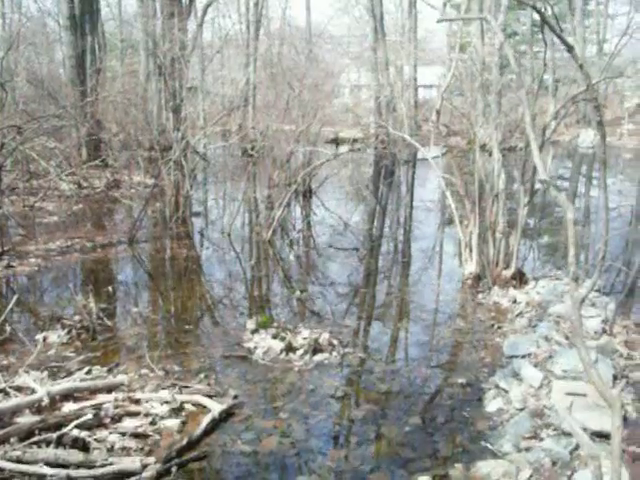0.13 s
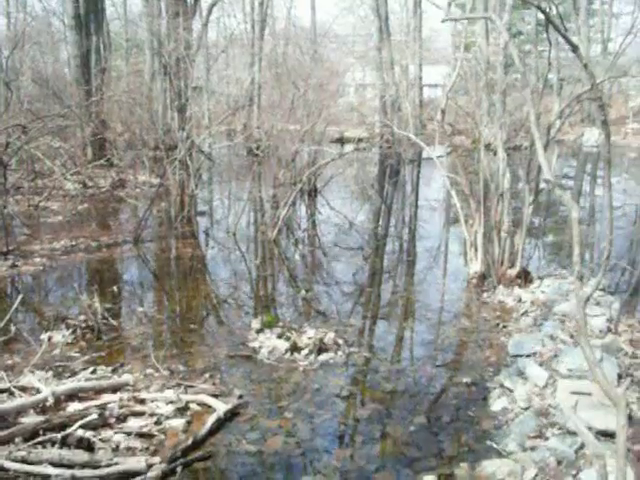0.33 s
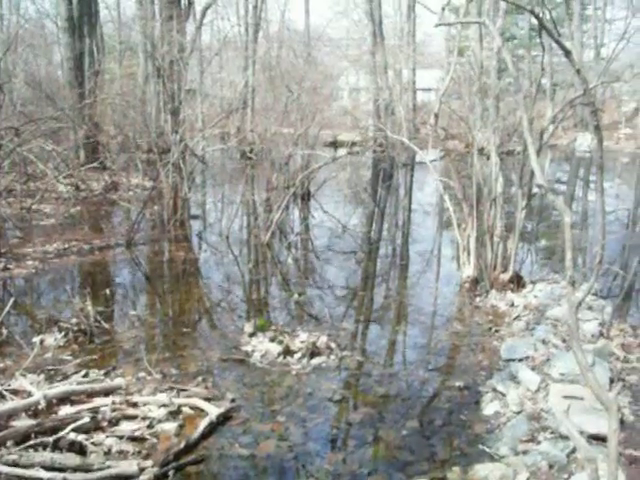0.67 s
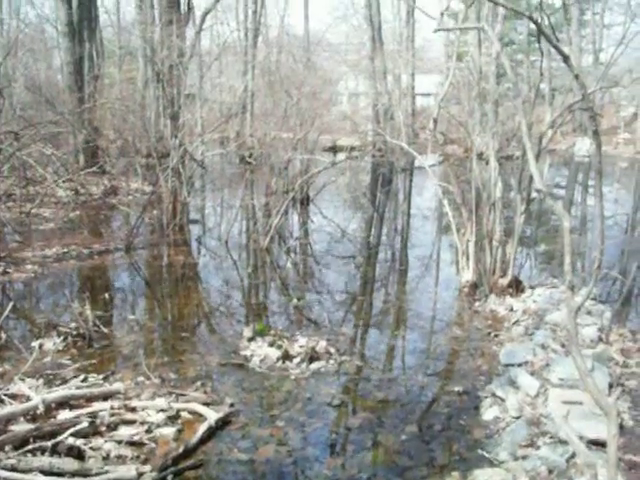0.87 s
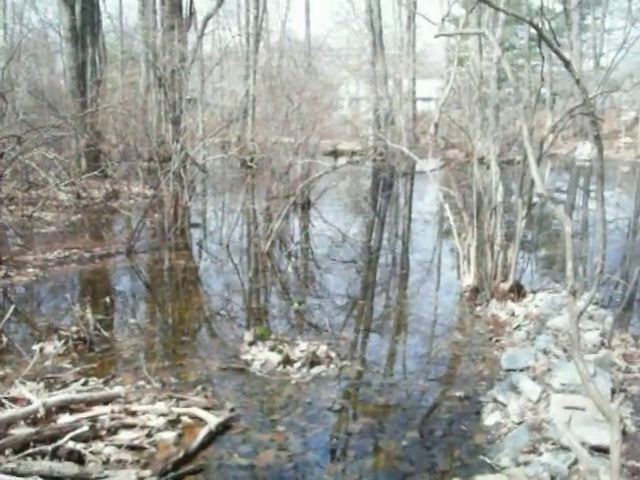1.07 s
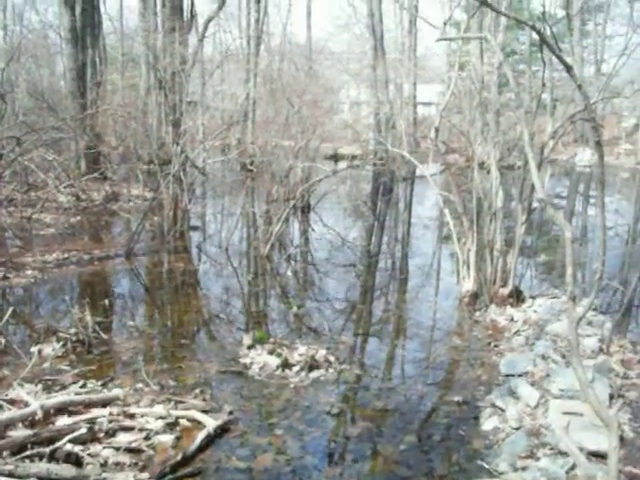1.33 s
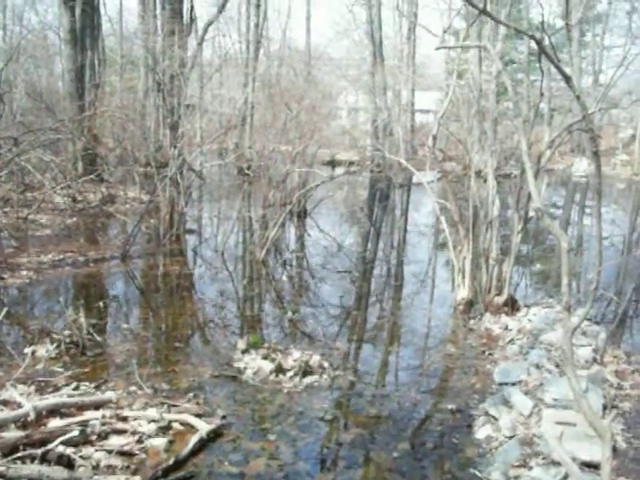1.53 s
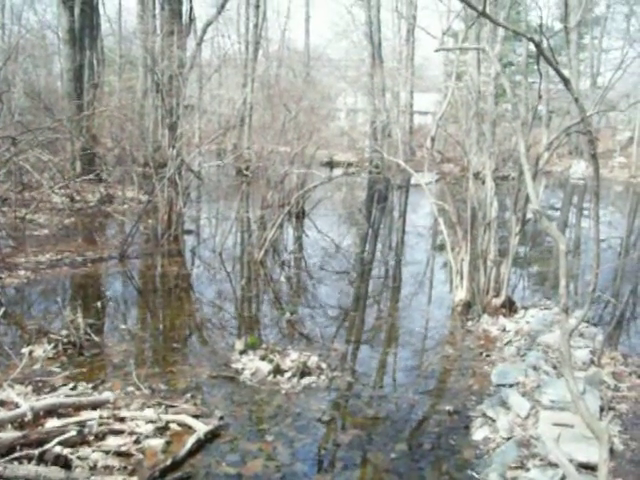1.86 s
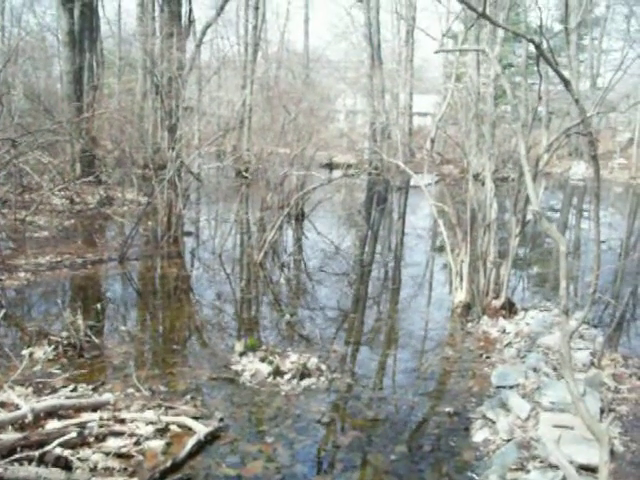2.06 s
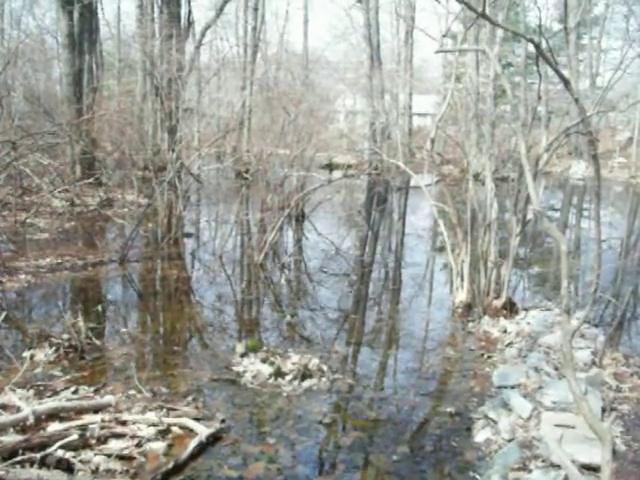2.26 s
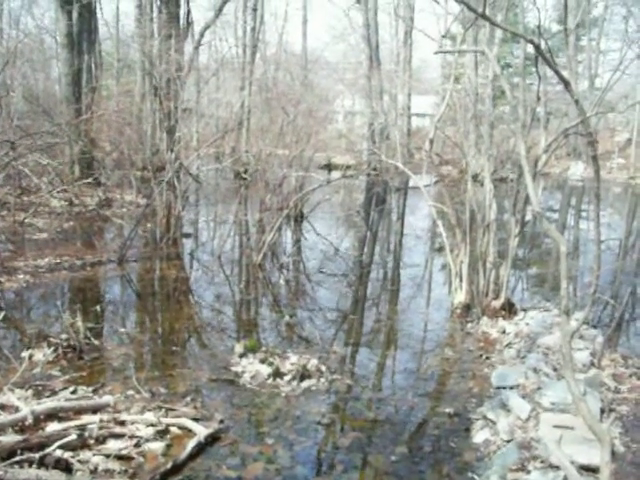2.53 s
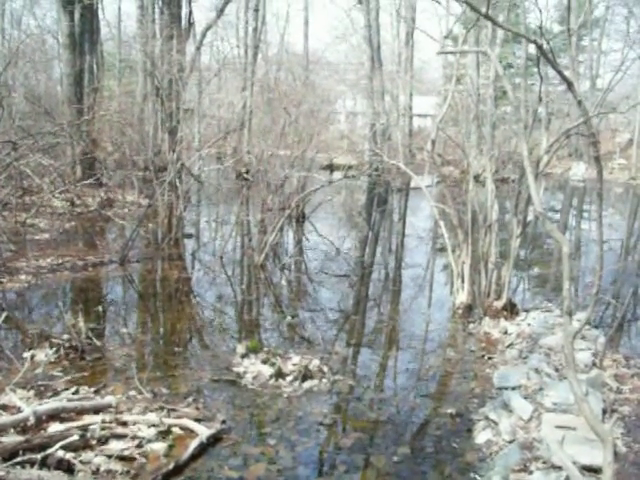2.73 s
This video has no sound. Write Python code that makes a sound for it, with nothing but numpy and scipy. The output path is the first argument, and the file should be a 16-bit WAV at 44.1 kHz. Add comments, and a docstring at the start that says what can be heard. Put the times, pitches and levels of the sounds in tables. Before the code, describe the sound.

A dense chorus of frogs, short raspy quacks near and far, runs continuously over a flooded wood; faint high trills and a few dry ticks join, while low wind thumps a small, dull, hissy microphone.

```python
"""A chorus of frogs quacks across a flooded wood: short rasping notes from near and far,
with a few thin high trills, dry ticks close by and wind buffeting the small microphone.
Quacks are wavering tones plus pulsed resonances, trills are roughened gliding tones, ticks are
bursts of noise, and wind and the farthest frogs are shaped noise. The recorder switches on just
after the start, with an offset that settles and a gain that opens."""
import sys
import numpy as np
from scipy import signal
from scipy.fft import rfft, irfft
from scipy.io import wavfile

SR = 44100
rng = np.random.default_rng(int(sys.argv[2]) if len(sys.argv) > 2 else 0)


def generate_wav(sig):
    """Save sig (samples, or channels by samples) to the path in sys.argv[1] as 16-bit PCM at SR."""
    pcm = np.round(np.clip(np.atleast_2d(sig).T, -1, 1) * 32767).astype(np.int16)
    wavfile.write(sys.argv[1], SR, pcm)


N = 127449

# bustle of the far chorus: (time [s], level change [dB])
FAR_BUSTLE = [(0.1, -1), (0.65, -1.5), (1.1, -0.5), (1.76, -3), (1.95, 2.5), (2.1, 0), (2.21, -10),
              (2.3, 2), (2.7, -1)]

ATTACK_S, RELEASE_S = 0.0059, .007   # of every quack


def amp(db):
    """Amplitude factor of a level in dB."""
    return 10 ** (np.asarray(db) / 20)


def rms_one(x):
    """Scale a sound to rms 1."""
    return x / np.sqrt(np.mean(x ** 2) + 1e-20)


def resonate(x, hz, width_hz):
    """Two-pole resonance applied twice, gain about 1 at its peak."""
    r = np.exp(-np.pi * width_hz / SR)
    b = [(1 - r * r) / 2, 0, (r * r - 1) / 2]
    a = [1, -2 * r * np.cos(2 * np.pi * hz / SR), r * r]
    return signal.lfilter(b, a, signal.lfilter(b, a, x))


def drift(rate_hz):
    """Slow random wandering of rms 1: noise through two equal one-pole low-passes."""
    r = np.exp(-2 * np.pi * rate_hz / SR)
    noise = rng.standard_normal(N + SR)
    wander = signal.lfilter([1], [1, -2 * r, r * r], noise)
    return rms_one(wander[SR:])   # drop the filter's first second


def coloured(spectrum):
    """Noise of rms 1 with a given spectrum, silent below its first frequency."""
    hz, db = np.transpose(spectrum)
    f = np.arange(N // 2 + 1) * SR / N + 1e-3   # kept above 0 for the logarithm
    gain = amp(np.interp(np.log(f), np.log(hz), db)) * (f > hz[0])
    return rms_one(irfft(rfft(rng.standard_normal(N)) * gain, N))


def swell(length):
    """Times and envelope of a note: attack, hold, release."""
    t = np.arange(int((max(length, .005) + 5 * RELEASE_S) * SR)) / SR
    attack = np.sin(np.pi / 2 * np.clip(t / ATTACK_S, 0, 1)) ** 2
    release = np.exp(-np.maximum(t - length, 0) / RELEASE_S)
    return t, attack * release


def add(track, s, sound):
    """Mix a sound into the track from time s."""
    i = int(s * SR)
    track[i:i + len(sound)] += sound


def bustle_db():
    """Level change of the far chorus at every sample."""
    return np.interp(np.arange(N) / SR, *np.transpose(FAR_BUSTLE))


def quack(db, low_hz, mid_hz, high_hz, length, mid_db, high_db, rasp_db, chance):
    """Three wavering tones that rise and sag, throbbing with the throat pulses, which also rasp above them."""
    # resonances of the rasp: (frequency [Hz], width [Hz], level [dB])
    rasp_resonances = [(1260, 1130, -7), (2340, 450, 6), (2984, 790, 3.5), (4800, 1700, -9)]
    arch, rise, throb_depth = .03, .04, 0.34   # shares of pitch, pitch and amplitude
    wobble_step_s, wobble_db, wobble_rad = .004, 2.5, 1.0
    pulses_per_low_cycle, jitter, pulse_spread_db = .5, .1, 4

    t, envelope = swell(length)
    arched = arch * (.5 - (2 * t / length - 1).clip(-1, 2) ** 2)
    bend = 1 + arched + rise * (t / length - .5).clip(-1, 1)
    # rows of chance: 0-2 tone levels, 3-5 tone phases, 6 pulse timing, 7 pulse strength
    wobble = [np.interp(t / wobble_step_s, np.arange(len(row)), row) for row in chance]
    pulse_cycles = np.cumsum(bend * (1 + jitter * wobble[6])) / SR * low_hz * pulses_per_low_cycle

    tones = 0
    for k, (hz, level_db) in enumerate([(low_hz, 0), (mid_hz, mid_db), (high_hz, high_db)]):
        phase = 2 * np.pi * hz * np.cumsum(bend) / SR + wobble_rad * wobble[k + 3]
        tones = tones + amp(level_db + wobble_db * wobble[k]) * np.sin(phase)
    tones = rms_one(tones * (1 + throb_depth * np.cos(2 * np.pi * pulse_cycles)))

    # one click each time a throat cycle completes
    pulses = np.diff(np.floor(pulse_cycles), prepend=0) * amp(pulse_spread_db * wobble[7])
    rasp = 0
    for k, (hz, width_hz, level_db) in enumerate(rasp_resonances):
        rasp = rasp + (-1) ** k * amp(level_db) * resonate(pulses, hz, width_hz)
    return amp(db) * envelope * (tones + amp(rasp_db) * rms_one(rasp))


def among_trunks(frog_sound):
    """Echo among the trunks: a tail of noise that starts after 4 ms and dies away exponentially."""
    echo_db, wood_t60_s = -11.5, 0.1
    t = np.arange(SR // 2) / SR
    tail = rng.standard_normal(len(t)) * amp(-60 * t / wood_t60_s) * (t > .004)
    tail = tail / np.sqrt(np.sum(tail ** 2))
    return frog_sound + amp(echo_db) * signal.fftconvolve(frog_sound, tail)[:N]


def frogs():
    """Near notes from the table, far ones at random, all echoing and thinned below the throat's floor."""
    # near quacks: (time [s], level before the common quack level [dB], low tone [Hz], middle tone [Hz],
    # high tone [Hz], length [s], middle against low tone [dB], high against low tone [dB],
    # rasp against all tones [dB])
    near_quacks = [(0.196, -14, 868, 1230, 1724, 0.028, -17.5, -2.5, -15.5),
                   (0.261, -11, 809, 1230, 1582, 0.016, -11, -3.5, -21),
                   (0.285, -13, 848, 1284, 1694, 0.027, -4, -4, -17),
                   (0.372, -15, 780, 1155, 1516, 0.023, -5, -2, -15),
                   (0.404, -12.5, 837, 1290, 1546, 0.022, -5.5, -18, -37),
                   (0.44, -10.5, 816, 1217, 1640, 0.033, -4.5, -22, -18),
                   (0.469, -11.5, 852, 1306, 1512, 0.024, -0.5, 9, -14.5),
                   (0.491, -11.5, 797, 1150, 1628, 0.022, -7.5, 2, -32),
                   (0.513, -14.5, 852, 1440, 1590, 0.02, -7.5, -1.5, -10.5),
                   (0.561, -14, 802, 1410, 1745, 0.019, -10, -7, -20),
                   (0.593, -15, 815, 1295, 1552, 0.023, -1, -4, -20),
                   (0.614, -14.5, 844, 1254, 1630, 0.032, -9, 3, -19),
                   (0.642, -14, 836, 1375, 1612, 0.029, -1, 0, -19.5),
                   (0.685, -12.5, 886, 1331, 1505, 0.022, -1, 0.5, -14.5),
                   (0.703, -16, 897, 1288, 1620, 0.014, -12, 0, -27),
                   (0.762, -16, 820, 1212, 1610, 0.025, -6, -10, -10),
                   (0.794, -12.5, 868, 1295, 1740, 0.02, -3, 4.5, -19),
                   (0.832, -19, 977, 1014, 1693, 0.018, -20, -9, -16),
                   (0.89, -17, 737, 1204, 1628, 0.032, -18, 3.5, -20),
                   (0.911, -12, 811, 1180, 1758, 0.022, -10.5, -2, -18.5),
                   (0.94, -20, 776, 1080, 1880, 0.021, -4, 1, -12),
                   (0.968, -16.5, 941, 1320, 1812, 0.02, -26, 5, -10),
                   (1.003, -15.5, 923, 1063, 1684, 0.019, 0.5, 1, -15),
                   (1.017, -13, 767, 1260, 1635, 0.026, -0.5, 8.5, -12),
                   (1.043, -9.5, 715, 1438, 1463, 0.015, -21.5, 2.5, -21),
                   (1.071, -10, 732, 1210, 1660, 0.015, 0.5, -5, -26.5),
                   (1.124, -17, 786, 1380, 1470, 0.028, -1.5, -10, -15),
                   (1.141, -15.5, 783, 1052, 1570, 0.022, -4, -17, -7),
                   (1.158, -10, 900, 1344, 1786, 0.02, -9.5, -3, -17),
                   (1.206, -15.5, 893, 1356, 1798, 0.018, -25, 8, -23),
                   (1.217, -11.5, 794, 1350, 1573, 0.021, -12.5, 1.5, -15),
                   (1.278, -12.5, 885, 1313, 1760, 0.022, -7, -4, -17.5),
                   (1.293, -21, 973, 1240, 1698, 0.022, -24, -4, -17),
                   (1.356, -8.5, 761, 1387, 1657, 0.015, -13, 1, -18),
                   (1.433, -13, 849, 1305, 1632, 0.035, 0, -8.5, -22),
                   (1.49, -13, 969, 1416, 1620, 0.015, -3, -8, -14),
                   (1.508, -8.5, 774, 1178, 1620, 0.023, -13, -3.5, -18),
                   (1.567, -18, 810, 1390, 1510, 0.0083, -3, -4, -21),
                   (1.612, -19.5, 934, 1390, 1645, 0.037, -16, -18.5, -13),
                   (1.63, -17, 790, 1250, 1660, 0.018, -12.5, 6, -13),
                   (1.649, -11, 799, 1206, 1640, 0.028, -8, -2.5, -13.5),
                   (1.667, -20, 767, 1352, 1760, 0.02, 6, -7, -19),
                   (1.709, -15.5, 827, 1059, 1890, 0.026, 0, -2.5, -17.5),
                   (1.791, -20, 700, 1008, 1454, 0.052, -5.5, -22.5, -30),
                   (1.826, -22, 814, 1134, 1418, 0.025, 3.5, 2, -12),
                   (1.836, -13.5, 771, 1205, 1780, 0.023, -3, 0, -13),
                   (1.894, -7, 825.6, 1180, 1450, 0.036, -3.5, -6, -19),
                   (1.941, -9.5, 698, 1347, 1700, 0.016, -4.5, -1, -34),
                   (1.994, -13.5, 845, 1267, 1667, 0.034, -10.5, -0.5, -14),
                   (2.02, -9.5, 838, 1310, 1490, 0.016, -3, -2, -16.5),
                   (2.05, -13.5, 786, 1398, 1577, 0.029, -3.5, -3, -22.5),
                   (2.134, -16.5, 701, 1080, 1760, 0.029, 0.5, -2, -16),
                   (2.241, -15, 875, 1167, 1693, 0.018, -3, 1, -15.5),
                   (2.254, -12.5, 754, 1127, 1487, 0.014, -11, -7, -22),
                   (2.292, -20, 847, 1195, 1750, 0.031, -11, 8, -10.5),
                   (2.339, -15.5, 870, 1430, 1773, 0.033, -4, -0.5, -13),
                   (2.37, -8.5, 850, 1136, 1755, 0.024, -7.5, 0, -22),
                   (2.396, -11, 808, 1309, 1700, 0.035, -4, -1.5, -13),
                   (2.447, -12, 860, 1386, 1854, 0.03, -9, -4.5, -14),
                   (2.496, -10.5, 841, 1395, 1594, 0.02, -8, -1, -20.5),
                   (2.552, -15, 964, 1150, 1627, 0.017, -10.5, 2, -13),
                   (2.56, -8, 814, 1210, 1764, 0.02, -16.5, -8.5, -17.5),
                   (2.593, -11, 852, 1440, 1885, 0.015, -2, 6, -21),
                   (2.628, -12, 918, 1372, 1720, 0.024, -13.5, 4.5, -15.5),
                   (2.647, -7.5, 784, 1210, 1670, 0.011, -24.5, -1.5, -15.5),
                   (2.732, -16.5, 788, 1240, 1626, 0.018, -14.5, 1.5, -12),
                   (2.745, -12, 837, 1237, 1635, 0.025, 0.5, 2, -16),
                   (2.778, -18, 918, 1280, 1720, 0.015, -30, -8, -34),
                   (2.83, -11.5, 838, 1158, 1696, 0.022, -4, 0, -14.5),
                   (2.86, -6.5, 803, 1209, 1655, 0.02, -1, -5.5, -21.5)]
    # tones of an average far frog: low, middle and high [Hz]
    average_tones_hz = [818.2, 1243, 1719]
    quack_db, lead_s = -12.5, .005   # common near level; each near note starts this much early
    far_count, far_db, far_spread_db = 300, -36, 4.5
    far_size_spread, far_rasp_db = 0.0805, -21   # size spreads each tone's log pitch
    throat_floor_hz = 610

    out = np.zeros(N + SR)
    near_chances = rng.standard_normal((len(near_quacks), 8, 40))
    for (s, db, *voice), chance in zip(near_quacks, near_chances):
        add(out, s - lead_s, quack(db + quack_db, *voice, chance))

    starts = rng.uniform(0, N / SR, far_count)
    picks = rng.standard_normal((far_count, 6))
    far_chances = rng.standard_normal((far_count, 8, 40))
    for s, p, chance in zip(starts, picks, far_chances):
        tones_hz = np.exp(far_size_spread * p[1:4]) * average_tones_hz
        db = far_db + np.interp(s, *np.transpose(FAR_BUSTLE)) + far_spread_db * p[0]
        mid_db, high_db = 3 * p[4] - 4, 3 * p[5] - 1.5
        add(out, s, quack(db, *tones_hz, .022, mid_db, high_db, far_rasp_db, chance))

    floor = signal.butter(4, throat_floor_hz, "high", fs=SR, output="sos")
    return signal.sosfilt(floor, among_trunks(out[:N]))


def farthest_chorus():
    """Frogs too far to tell apart: steady coloured noise that follows half the far bustle in dB."""
    # blur of the farthest chorus: (frequency [Hz], level per Hz [dB])
    blur_colour = [(180, -34), (300, -9.5), (544, -15), (796, 1), (1120, -5.5), (1700, -1.5), (2010, -15.5),
                   (3170, -17.5), (3980, -25.5), (5160, -25.5), (5550, -47.5), (6200, -49.5)]
    blur_db = -33
    return amp(blur_db + bustle_db() / 2) * coloured(blur_colour)


def wind():
    """Lumpy low turbulence on the microphone, its brightness changing, with a few single pushes."""
    # course of the wind: (time [s], level [dB], brightness: level above 70 Hz [dB])
    wind_course = [(0.09, -16.5, 4), (0.14, -31, 11.5), (0.4, -18.5, -0.5), (0.51, -27, -2),
                   (0.571, -13, -3.5), (0.63, -27, 12), (0.8, -17, 5), (1.051, -19, 4.5), (1.12, -18.5, -7),
                   (1.179, -15, 4), (1.24, -20.5, 4), (1.379, -18, 3), (1.41, -22.5, -0.5),
                   (1.699, -19, -7), (1.73, -25.5, 0.5), (1.771, -21.5, -3), (1.89, -21, -5.5),
                   (2.09, -29.5, -3), (2.23, -17, -9), (2.401, -19, 4), (2.63, -21.5, -0.5),
                   (2.81, -23, -7)]
    # turbulence: (frequency [Hz], level per Hz [dB])
    wind_colour = [(7.1, -22), (12, 9.5), (27, 3.5), (80, -2.5), (207, -17), (412, -35), (462, -42.5),
                   (562, -45), (600, -31), (780, -45), (1320, -120)]
    # single buffets, bell-shaped: (time [s], signed height [full scale], half-width at 1/e [s])
    pushes = [(0.551, 0.36, 0.0012), (0.58, 0.11, 0.0089), (1.0059, 0.3, 0.00052), (1.766, -0.42, 0.0032)]
    lumps_db, lumps_hz = 1.5, 15

    t = np.arange(N) / SR
    s, db, bright_db = np.transpose(wind_course)
    noise = coloured(wind_colour)
    low = signal.sosfiltfilt(signal.butter(2, 70, fs=SR, output="sos"), noise)
    high = (noise - low) * amp(np.interp(t, s, bright_db) + lumps_db * drift(lumps_hz))
    out = amp(np.interp(t, s, db)) * (low + high)
    for at, height, width_s in pushes:
        out = out + height * np.exp(-((t - at) / width_s) ** 2)
    return out


def trills():
    """Thin breathy whistles: roughened tones that swell, throb and fall a little."""
    # high trills: (time [s], level before throb and roughness [dB], mid-note pitch [Hz], length [s])
    trill_notes = [(0.265, -29.5, 3400, 0.025), (0.451, -35, 5180, 0.0215), (1.015, -46, 4940, 0.035),
                   (1.201, -40, 4700, 0.056), (1.317, -35, 4600, 0.019), (1.447, -37.5, 4770, 0.054),
                   (1.647, -38, 4880, 0.025), (1.80, -40, 5080, 0.037), (2.388, -39, 3830, 0.058),
                   (1.988, -42, 5040, 0.04), (2.591, -35, 4750, 0.064), (2.73, -42, 4950, 0.045)]
    pulses_per_s, throb_depth, grain_hz = 165, .35, 170
    fall = .04   # share of pitch lost over the length
    rise_share, release_s = .7, .004   # rise as a share of the length

    out = np.zeros(N + 2 * SR)
    grain = np.tile(drift(grain_hz) + 1j * drift(grain_hz), 2)
    for s, db, hz, length in trill_notes:
        t = np.arange(int((length + .05) * SR)) / SR
        rise = np.clip(t / (rise_share * length), 0, 1)
        envelope = rise * np.exp(-np.maximum(t - length, 0) / release_s)
        throb = 1 - throb_depth * np.cos(np.pi * pulses_per_s * t) ** 2
        pitch_hz = hz * (1 + fall * (.5 - t / length).clip(-1, 1))
        start = int(s * SR)
        # complex roughness shakes both level and phase
        rough = .4 + .5 * grain[start:start + len(t)]
        whistle = np.imag(rough * np.exp(2j * np.pi * np.cumsum(pitch_hz) / SR))
        add(out, s, amp(db) * envelope * throb * whistle)
    return out[:N]


def ticks():
    """Short bright cracks: random-sign noise that dies fast, held to a treble band."""
    # dry ticks: (time [s], starting level before the band filter [dB])
    tick_hits = [(0.991, -25), (0.997, -19), (1.0035, -23.5), (1.0579, -18.5), (1.1447, -10.5),
                 (1.7654, -27.5)]
    t60_s, low_hz, high_hz = .016, 3000, 5600

    out, t = np.zeros(N + SR), np.arange(SR // 20) / SR
    noises = np.sign(rng.standard_normal((len(tick_hits), len(t))))
    for (s, db), noise in zip(tick_hits, noises):
        add(out, s, amp(db) * noise * amp(-60 * t / t60_s))
    band = signal.butter(2, [low_hz, high_hz], "band", fs=SR, output="sos")
    return signal.sosfilt(band, out[:N])


def scene():
    """All the sounds of the wood and the wind, mixed to one channel."""
    return (frogs() + trills() + ticks() + wind() + farthest_chorus())[None]


def record(dry):
    """The gain opens after switch-on over a steady hiss, the top is cut, and an offset settles."""
    on_s, open_from_db, open_s = .0727, -17.5, 0.085
    hiss_db = -44.5   # the recorder's own noise, before the treble is cut
    shelf_hz, shelf_db = 5420, -3.5   # the microphone's treble steps down
    cutoff_hz = 6600   # everything above is at least 70 dB down
    offset_start, offset_hold_s, offset_settle_s = -0.31, 0.2, 0.16

    t = np.maximum(np.arange(N) / SR - on_s, 0)   # time since switch-on
    gain = amp(open_from_db * np.exp(-t / open_s))
    opened = dry * gain + amp(hiss_db) * rng.standard_normal(N)
    under = signal.sosfiltfilt(signal.butter(12, shelf_hz, fs=SR, output="sos"), opened)
    shelved = under + amp(shelf_db) * (opened - under)
    cut = signal.sosfilt(signal.cheby2(14, 70, cutoff_hz, fs=SR, output="sos"), shelved)
    offset = offset_start * np.exp(-np.maximum(t - offset_hold_s, 0) / offset_settle_s)
    on = (t > 0) * (cut + offset)   # silence until switch-on
    # a last low-pass softens the switch-on step
    return signal.sosfilt(signal.cheby2(8, 40, 17000, fs=SR, output="sos"), on)


dry = scene()
out = record(dry)
generate_wav(out)
```